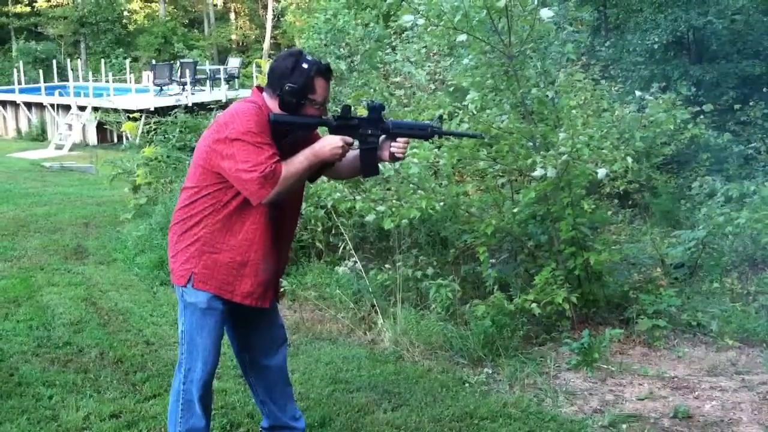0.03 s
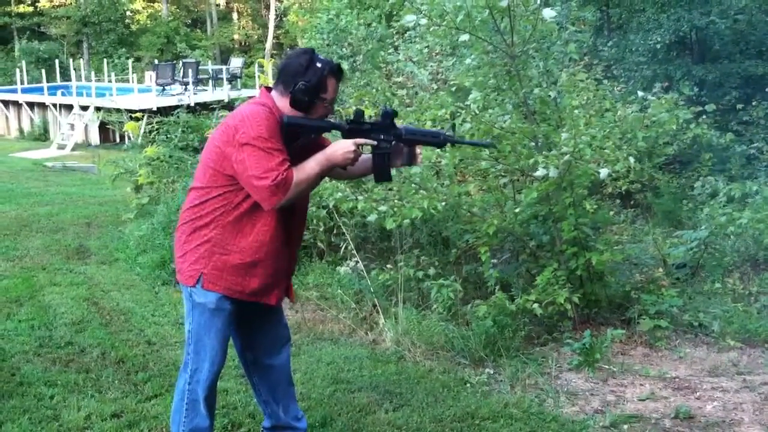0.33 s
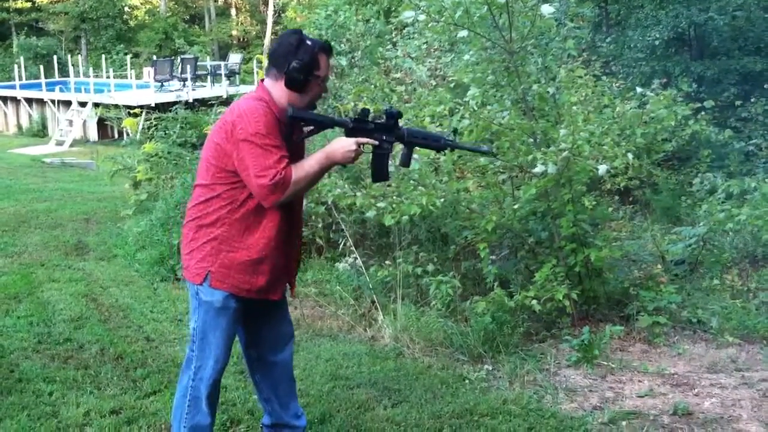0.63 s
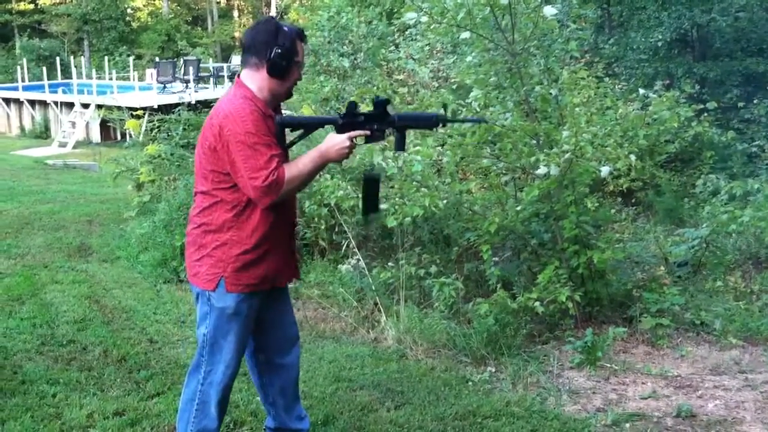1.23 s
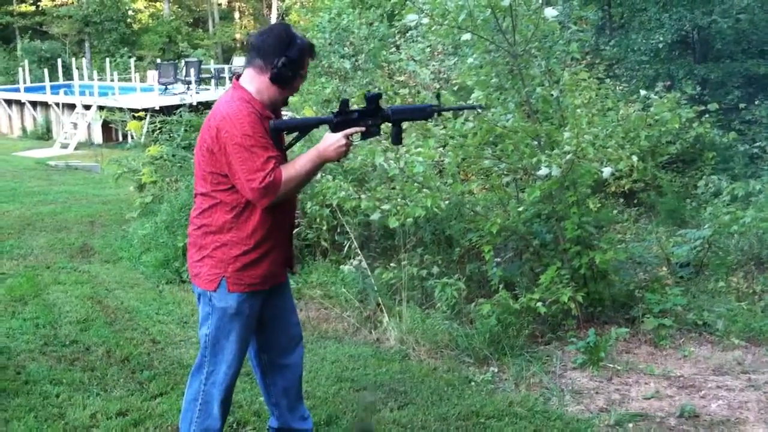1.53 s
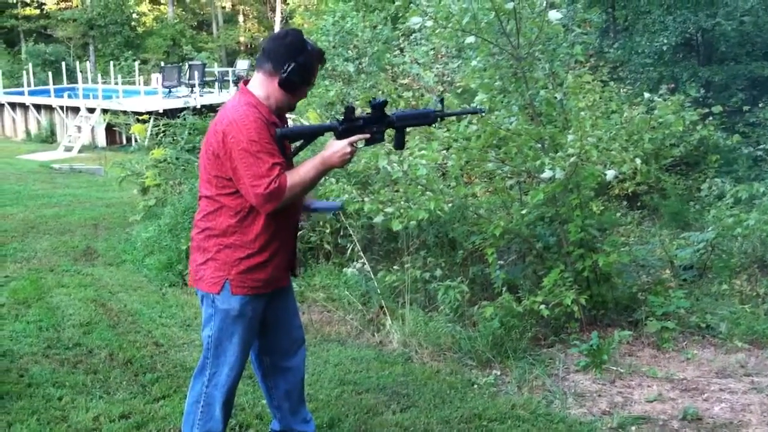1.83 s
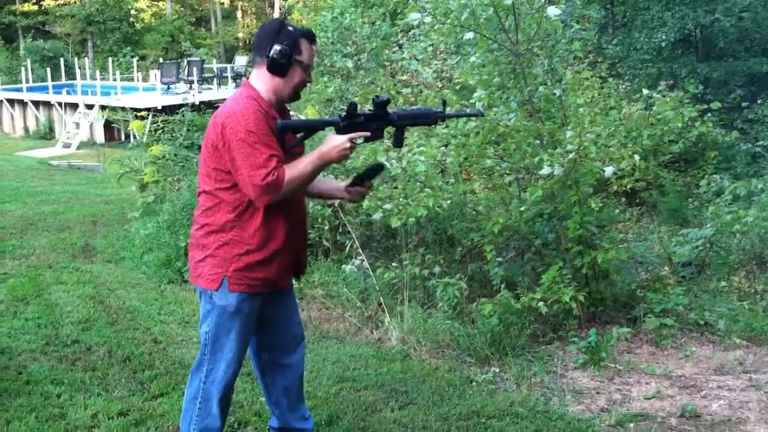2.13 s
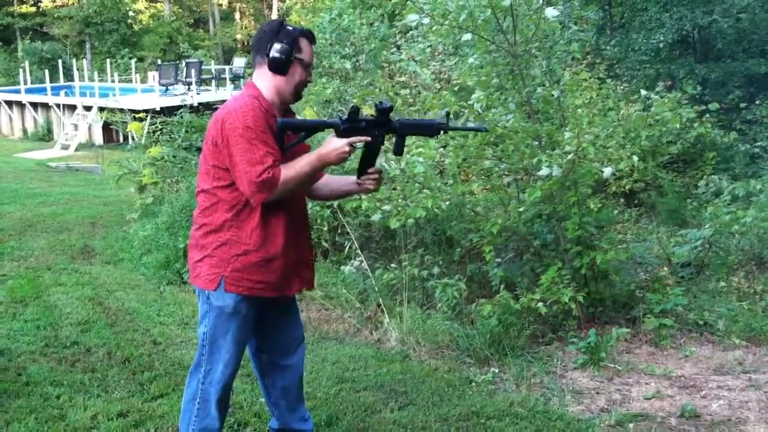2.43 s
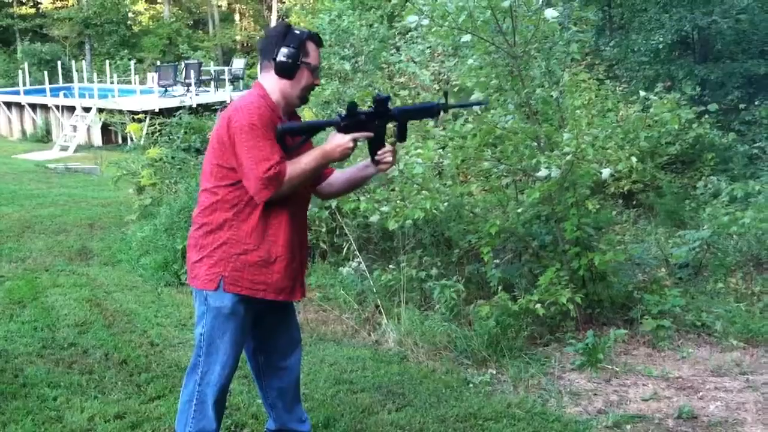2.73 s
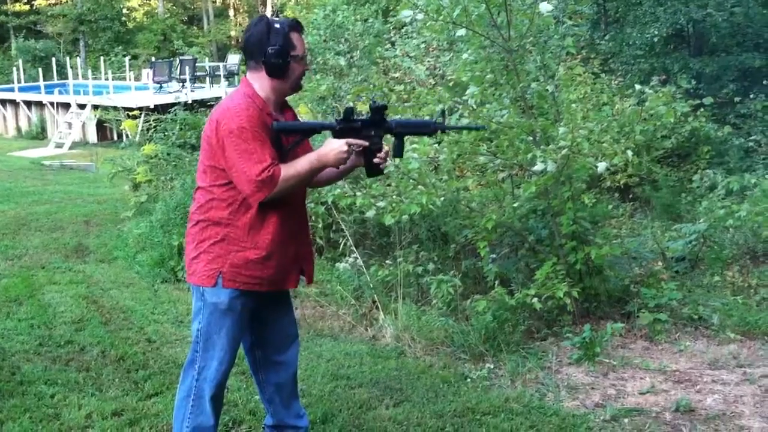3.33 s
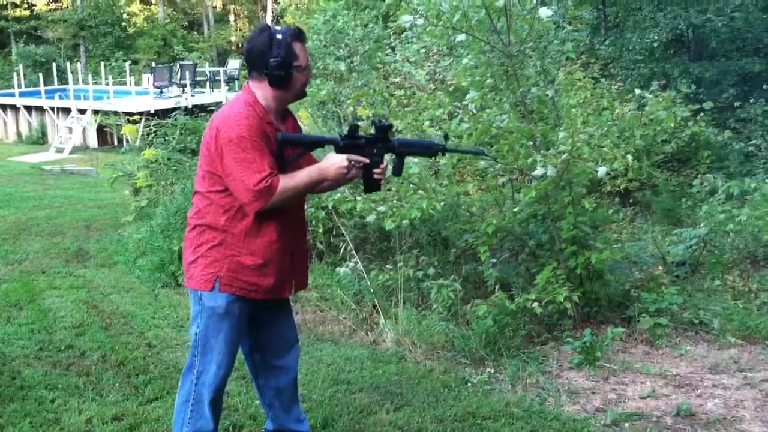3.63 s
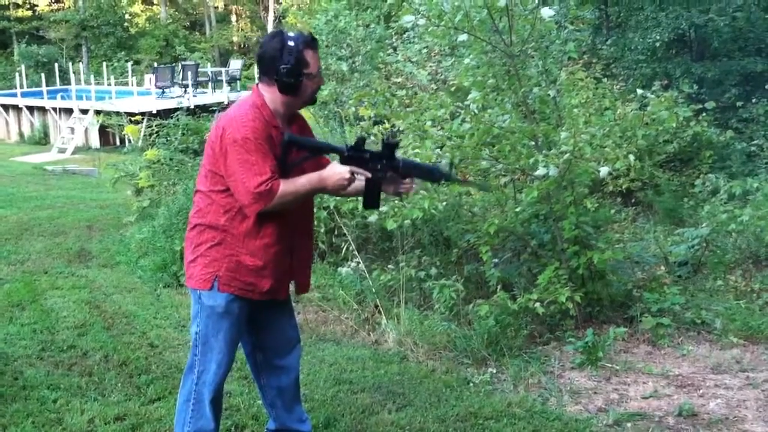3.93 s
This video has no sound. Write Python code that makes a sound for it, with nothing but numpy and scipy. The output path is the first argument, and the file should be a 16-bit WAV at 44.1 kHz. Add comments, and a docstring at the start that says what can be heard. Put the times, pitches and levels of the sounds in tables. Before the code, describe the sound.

A rifle is reloaded close by as a gunshot's echo fades through woods. The empty magazine drops with a clatter, a fresh one clicks in, and the bolt slams shut. Faint crickets chirp throughout.

```python
"""Rifle reload after a shot.

A shot's echo rolls away through the woods while the shooter changes magazines. The catch clicks, the
empty magazine falls and bounces, a fresh one is guided in and seated, and the bolt slams shut. Each
contact rattles and rings its part. Insects sing faintly; a limiter ducks the level from the slam on."""
import sys
import numpy as np
from scipy import signal
from scipy.fft import rfft, irfft, next_fast_len
from scipy.io import wavfile
from scipy.ndimage import uniform_filter1d, map_coordinates

SR = 44100
rng = np.random.default_rng(int(sys.argv[2]) if len(sys.argv) > 2 else 0)


def unload_audio(sound):
    """Save the sound as a 16-bit wav file, at the path given as the first command line argument."""
    columns = np.transpose(np.atleast_2d(sound))
    # keep every value between -1 and 1, then stretch to whole-number steps
    steps = np.round(np.clip(columns, -1, 1) * 32767)
    wavfile.write(sys.argv[1], SR, steps.astype(np.int16))


N = 176400
ATTACK_S = 0.0013


def amp(db):
    """Decibels to gain."""
    return 10 ** (np.asarray(db) / 20)


def unit(x):
    """Scale to rms 1."""
    return x / np.sqrt(np.mean(x ** 2) + 1e-20)


def along(points, hz):
    """Interpolate (frequency, value) points on a log axis."""
    freqs, values = np.transpose(points)
    return np.interp(np.log(hz + 1), np.log(freqs + 1), values)


def wobble(knots_per_s, size=N):
    """Smooth random curve."""
    return map_coordinates(rng.standard_normal(size // 4), [np.arange(size) * knots_per_s / SR],
                           mode='mirror')


def noise(colour, tilt_db_per_oct=0, size=N):
    """Coloured noise of rms 1, tilted above 1500 Hz."""
    hz = np.fft.rfftfreq(size, 1 / SR)
    octaves = np.log2(np.maximum(hz, 1500) / 1500)
    gain = amp(along(colour, hz) + tilt_db_per_oct * octaves)
    return unit(irfft(rfft(rng.standard_normal(size)) * gain, size))


def add(track, start_s, sound):
    """Mix a sound into a track."""
    part = track[round(start_s * SR):][:len(sound)]
    part += sound[:len(part)]


def contacts(hits, colour, modes, size=16384):
    """Each contact is a clumpy burst of tiny collisions that feeds the part's damped modes."""
    out, t = np.zeros(N), np.arange(size) / SR
    for start_s, level_db, tilt, hold_s, fall_s in hits:
        force = np.minimum(t / ATTACK_S, 1) * amp(-60 * np.maximum(t - hold_s, 0) / fall_s)
        grain_db = -2 * wobble(1600, size)
        clump_db = 0.9 * wobble(310, size)
        sound = force * unit(noise(colour, tilt, size) * amp(grain_db + clump_db))
        for centre_hz, mean_db, t60_s in modes:
            hz = centre_hz * (1 + 0.0038 * rng.normal())
            mode_db = mean_db + 3.1 * rng.normal() + tilt * np.log2(hz / 4000)
            keep = np.exp(-2 * np.log(1000) / (t60_s * SR))  # energy left after one sample
            ring = np.sqrt(signal.lfilter([1 - keep], [1, -keep], force ** 2))
            drift_rad = 0.61 * np.sqrt(1 - keep) * np.cumsum(rng.standard_normal(size))
            phase_rad = 2 * np.pi * hz * t + drift_rad + rng.uniform(0, 2 * np.pi)
            sound += amp(mode_db) * ring * np.sin(phase_rad)
        add(out, start_s, amp(level_db) * sound)
    return out


# bolt contacts (time [s], level [dB], tilt [dB/oct], hold [s], t60 [s])
SLIDE_HITS = [(3.509, -25.5, 0.69, 0.0077, 0.016), (3.524, -23.5, -0.11, 0.012, .04),
              (3.541, -28, -0.39, 0.027, 0.038)]
SLAM_HITS = [(3.5649, -13, 0.014, 0.0022, 0.0081), (3.5671, -6.5, 0.0097, 0.0041, 0.032)]
# rattle spectra (frequency [Hz], level [dB])
SLIDE_SPECTRUM = [(40, -28), (450, -29), (800, 0), (1000, -4.5), (1400, 1), (2500, 3), (3200, -5.5),
                  (4200, -10.5), (5600, 2), (6600, -9.5), (7800, -0.5), (9200, -10), (11000, -3.5),
                  (13000, -14.5), (15000, -31)]
SLAM_SPECTRUM = [(30, -18.5), (70, -13.5), (120, -6.5), (250, -1), (550, -3), (1000, -7.5), (1800, -1.5),
                 (2600, -1.5), (3300, -7), (5000, -5.5), (6200, 5.5), (7400, 1), (8600, -9.5),
                 (11000, -3.5), (13000, -9.5), (15000, -32)]
# modes (frequency [Hz], level over rattle [dB], t60 [s])
SLIDE_RING = [(1376, -7.5, 0.047), (1650, -8, 0.037), (2510, -10, .04), (5820, -11.5, 0.034)]
SLAM_RING = [(2760, -14, .03), (5636, -12.5, 0.12), (5956, -13.5, 0.068), (6320, -17.5, 0.046),
             (6700, -7.5, .04), (6800, -23, .2), (7900, -21.5, 0.13)]


def bolt():
    """The bolt scrapes a round out of the magazine and slams into lock."""
    slide = contacts(SLIDE_HITS, SLIDE_SPECTRUM, SLIDE_RING)
    return slide + contacts(SLAM_HITS, SLAM_SPECTRUM, SLAM_RING)


def thump(hz=167, level_db=-19.5, t60_s=0.045):
    """The rifle's body takes up the bolt's momentum in one low, dull push."""
    out, t = np.zeros(N), np.arange(SR // 5) / SR
    envelope = np.minimum(t / ATTACK_S, 1) * amp(level_db - 60 * t / t60_s)
    add(out, SLAM_HITS[0][0], envelope * np.cos(2 * np.pi * hz * t))
    return out


# coil spectrum (frequency [Hz], level [dB])
SPRING_SPECTRUM = [(3000, -54), (5500, -14.5), (6700, -4), (7300, 1), (7900, 0), (8600, -19),
                   (12000, -45.5)]


def spring(level_db=-23.5, t60_s=0.26):
    """The slam shakes a dense cluster of coil modes."""
    out, t = np.zeros(N), np.arange(SR) / SR
    add(out, SLAM_HITS[0][0], noise(SPRING_SPECTRUM, size=SR) * amp(level_db - 60 * t / t60_s))
    return out


# catch and landing contacts (time [s], level [dB], tilt [dB/oct], hold [s], t60 [s])
RELEASE_HITS = [(1.105, -42.5, 0, .004, .03), (1.116, -44, 0, .002, 0.12)]
DROP_HITS = [(1.5655, -16, -1, 0.00086, 0.0168), (1.571, -27.5, 4, 0.0067, 0.07),
             (1.581, -25, 1, 0.0047, 0.295), (1.606, -34, -1, .002, .14), (1.765, -39.5, -2, 0.0093, 0.32)]
# rattle spectra (frequency [Hz], level [dB])
RELEASE_SPECTRUM = [(40, -12), (700, -8), (1600, 0), (2200, -10), (4000, -10), (5600, -3), (8500, -6),
                    (11500, -4), (13500, -17), (15500, -24)]
DROP_SPECTRUM = [(40, -37.5), (300, -36), (800, -7), (1100, 2.5), (1400, -2), (1800, 1.5), (3000, -11),
                 (4000, -9), (5500, -2), (7300, -4), (8600, -13), (10500, -3.5), (12000, -8),
                 (13500, -21.5), (15500, -23)]
# modes (frequency [Hz], level over rattle [dB], t60 [s])
RELEASE_RING = [(1650, -1, .04), (2520, -1, .06)]
DROP_RING = [(1047, -0.5, 0.038), (1135, -4.5, 0.094), (1630, -11.5, 0.057), (1740, -7.5, 0.06),
             (1825, -16.5, .14), (2494.6, -17, .25), (5500, -19, .04), (7060, -17, .04)]


def empty_magazine():
    """The catch lets go; the magazine lands, rattles and bounces."""
    release = contacts(RELEASE_HITS, RELEASE_SPECTRUM, RELEASE_RING)
    return release + contacts(DROP_HITS, DROP_SPECTRUM, DROP_RING)


# handling and seating contacts (time [s], level [dB], tilt [dB/oct], hold [s], t60 [s])
HANDLING_HITS = [(1.205, -55.5, -1.5, .003, 0.054), (1.393, -66, 3, .003, .04),
                 (1.936, -63.5, 2, .002, .03), (2.341, -34, 1, .004, 0.034),
                 (2.3545, -23, 0, 0.00067, 0.043), (2.383, -30.5, -2.5, .003, 0.034),
                 (2.434, -40.5, -0.5, .002, 0.024), (2.445, -44, -1.5, .002, 0.0341),
                 (2.590, -43, 0.5, .004, 0.03), (2.602, -45.5, -1.5, .002, .035),
                 (2.648, -35.5, 0.5, 0.0036, .03), (2.656, -20.5, 0, 0.0054, 0.029),
                 (2.674, -37, -0.5, 0.0085, 0.045), (2.8615, -35.5, 3, .003, 0.02),
                 (2.917, -43.5, -2, 0.00068, 0.058), (3.158, -54.5, -2.5, 0.0033, 0.033),
                 (3.173, -57.5, -2, 0.0017, 0.049)]
SEAT_HITS = [(2.6895, -14.5, 0.0044, 0.0035, .025), (2.701, -29.5, 0.0032, 0.0043, .06),
             (2.729, -62, 0, .002, .05)]
# rattle spectra (frequency [Hz], level [dB])
HANDLING_SPECTRUM = [(40, -26.5), (200, -18), (700, -9.5), (1000, -9.5), (1600, 2.5), (2500, 1),
                     (3100, -10.5), (4600, -8.5), (7500, -9), (11000, -10), (13000, -13.5), (15000, -33.5)]
SEAT_SPECTRUM = [(40, -24.5), (300, -22), (700, -4), (950, -10), (1600, 1.5), (2400, 0), (3100, -10),
                 (5200, -5), (6800, -8.5), (10000, -11), (12500, -10.5), (15000, -33.5)]
# modes (frequency [Hz], level over rattle [dB], t60 [s])
HANDLING_RING = [(848, -11, 0.039), (1355, -4.5, 0.03), (1666, -0.5, 0.0086), (2080, -15.5, 0.016),
                 (2530, -10, .02), (5540, -6, 0.0088)]
SEAT_RING = [(694, -18.5, 0.044), (1120, -6.5, 0.017), (1610, -11.5, 0.11), (2230, -8.5, 0.02),
             (3534, -11.5, 0.018), (5070, -11, .03)]


def fresh_magazine():
    """Hands move on the rifle; the magazine knocks in its well and seats as the catch snaps in."""
    handling = contacts(HANDLING_HITS, HANDLING_SPECTRUM, HANDLING_RING)
    return handling + contacts(SEAT_HITS, SEAT_SPECTRUM, SEAT_RING)


# initial echo spectrum (frequency [Hz], level [dB])
ECHO_SPECTRUM = [(30, -51), (60, -51.5), (100, -34), (160, -16), (260, -14.5), (400, -4.5), (650, 3.5),
                 (850, 1.5), (1150, -6.5), (2000, -8), (3200, -12), (5000, -13), (8000, -19), (11000, -24),
                 (15000, -58)]
# echo fade (frequency [Hz], loss [dB/s])
ECHO_FADE = [(60, 0.5), (150, 1.83), (300, 0), (450, 4.5), (700, 7.5), (1100, 12), (1900, 16.5),
             (3200, 29.5), (5000, 40), (8000, 55), (14000, 62.5)]
# returns from stands of trees (time [s], boost [dB], half width [s])
TREE_RETURNS = [(.04, 1.5, 0.058), (.165, 1, 0.013), (.222, 1, 0.028), (.30, 0.5, .05), (.432, 1, 0.028),
                (.49, 0.5, 0.0252)]


def shot_echo(spread_s=0.57, spread_db_per_decade=12.5, size=1024):
    """Countless reflections from trees, ever farther, weaker and duller, with a few stronger returns."""
    t = np.arange(N) / SR
    level_db = -19.5 - spread_db_per_decade * np.log10(np.hypot(1, t / spread_s)) + 0.5 * wobble(90)
    level_db += sum(db * np.exp(-((t - time_s) / width_s) ** 2) for time_s, db, width_s in TREE_RETURNS)
    hz, frame_s, bands = signal.stft(noise(ECHO_SPECTRUM), SR, nperseg=size)
    bands *= amp(-along(ECHO_FADE, hz)[:, None] * frame_s)
    return amp(level_db) * signal.istft(bands, SR, nperseg=size)[1][:N]


# reverb decay (frequency [Hz], t60 [s])
WOODS_DECAY = [(200, .7), (1500, 1.5), (4000, .9), (7000, 0.94), (13000, .5)]
# reverb colour (frequency [Hz], gain [dB])
WOODS_SPECTRUM = [(40, -18), (150, -15), (1000, -5), (2000, -7), (4000, 4.5), (7000, -7.5), (10000, -1.5),
                  (13000, -6)]


def woods(source, gain_db=-16.5, size=256):
    """Bushes and trees take up each band's energy and give it back as a diffuse, dying wash."""
    hz, frame_s, bands = signal.stft(source, SR, nperseg=size)
    power = np.abs(uniform_filter1d(np.abs(bands) ** 2, size=5, axis=0))
    keep = amp(-120 * frame_s[1] / along(WOODS_DECAY, hz))  # energy left after one frame
    stored = np.array([signal.lfilter([0, 0, 1 - k], [1, -k], p) for k, p in zip(keep, power)])
    wash = signal.stft(rng.standard_normal(N), SR, nperseg=size)[2]
    wash = wash / np.std(wash) * np.sqrt(stored) * amp(gain_db + along(WOODS_SPECTRUM, hz))[:, None]
    return signal.istft(wash, SR, nperseg=size)[1][:N]


# chirps (time [s], pitch [Hz], level [dB], note spacing [s])
CRICKET_CHIRPS = [(.62, 4350, -63, 0.0255), (.88, 4580, -69, 0.038), (.91, 4320, -57.5, 0.022),
                  (1.179, 4340, -57.5, 0.03), (1.24, 4560, -60, 0.0493), (1.33, 4800, -69, 0.032),
                  (1.461, 4340, -59, 0.022), (1.79, 4310, -58, 0.028), (1.95, 4550, -57.5, 0.051),
                  (2.048, 4240, -58, 0.03), (2.08, 4800, -62.5, .04), (2.239, 4370, -62, 0.029),
                  (2.389, 4380, -56.5, 0.025), (2.47, 4500, -68, 0.022), (2.95, 4340, -57.5, 0.029),
                  (3.0, 4560, -57, .052), (3.221, 4310, -56.5, 0.029), (3.35, 4780, -62, 0.028),
                  (3.382, 4650, -58.5, .052), (3.879, 4380, -54.5, 0.03)]


def crickets(notes=4, note_s=0.04, sag_hz_per_s=6000, scatter_hz=34.6, scatter_db=2.5):
    """Crickets chirp in runs of short falling notes."""
    out, t = np.zeros(N), np.arange(SR // 10) / SR
    envelope = np.sin(np.pi * np.minimum(t / note_s, 1)) ** 2
    for start_s, pitch_hz, level_db, spacing_s in CRICKET_CHIRPS:
        for k, (detune, accent) in enumerate(rng.standard_normal((notes, 2))):
            hz = pitch_hz + scatter_hz * detune - sag_hz_per_s * (t - note_s / 2)
            note = envelope * np.sin(2 * np.pi * np.cumsum(hz) / SR)
            add(out, start_s + k * spacing_s, amp(level_db + scatter_db * accent) * note)
    return out


# insect spectra (frequency [Hz], level [dB])
HISS_SPECTRUM = [(3000, -39), (3900, -19), (4500, 2.5), (5300, -12), (6000, -8.5), (6700, 2), (7300, 1.5),
                 (8200, -14.5), (12000, -22), (15000, -37.5)]
RASP_SPECTRUM = [(3000, -41.5), (3900, -13.5), (4350, 3.5), (4550, -2.5), (4850, -6.5), (5050, -13),
                 (5800, -42.5)]


def insect_chorus(hiss_db=-68.5, rasp_db=-70):
    """Distant insects merge into a high, steady hiss and a fluttering rasp."""
    hiss = amp(hiss_db + 0.8 * wobble(29)) * noise(HISS_SPECTRUM)
    rasp = amp(rasp_db + 2.5 * wobble(70)) * noise(RASP_SPECTRUM)
    return hiss + rasp


# ambient spectrum (frequency [Hz], level [dB])
AIR_SPECTRUM = [(25, -35.5), (60, -23.5), (110, -3.5), (170, -6), (500, 0.5), (1200, -10), (1900, -8.5),
                (3000, -16), (8000, -32.5), (15000, -52)]


def air(level_db=-65.5):
    """Faint, steady outdoor hush."""
    return amp(level_db) * noise(AIR_SPECTRUM)


def scene():
    """The rifle close by; woods, echo and insects behind it. Mono."""
    rifle = empty_magazine() + fresh_magazine() + bolt() + spring() + thump()
    return (rifle + woods(rifle) + shot_echo() + insect_chorus() + crickets() + air())[None]


def record(dry):
    """Microphone low cut, an instant limiter that holds its lowest gain, then a band limit."""
    low_cut_hz, limit_db, top_hz = 110, -3.5, 15900
    dry = signal.sosfilt(signal.butter(2, low_cut_hz, 'high', fs=SR, output='sos'), dry)
    needed_db = np.minimum(0, limit_db - 20 * np.log10(np.abs(dry[0]) + 1e-9))
    limited = dry * amp(np.minimum.accumulate(needed_db))
    size = next_fast_len(N + SR // 2)
    passband = np.fft.rfftfreq(size, 1 / SR) < top_hz
    return irfft(rfft(limited, size) * passband, size)[:, :N]


dry = scene()
out = record(dry)
unload_audio(out)
```